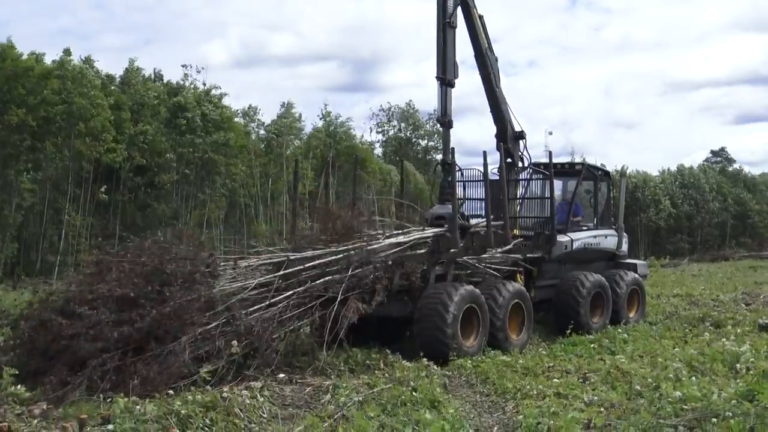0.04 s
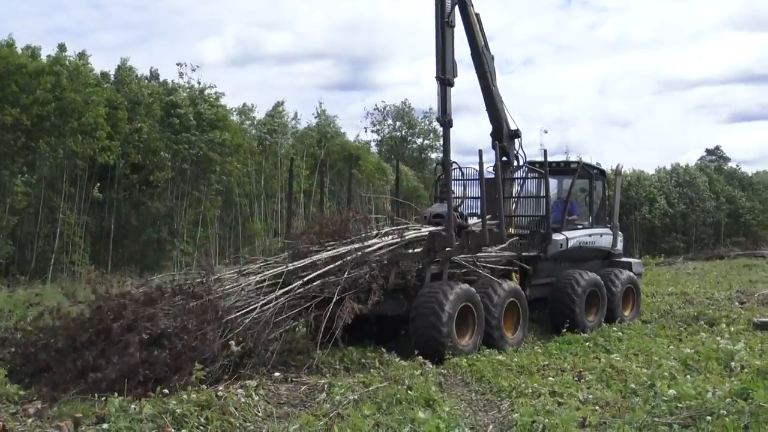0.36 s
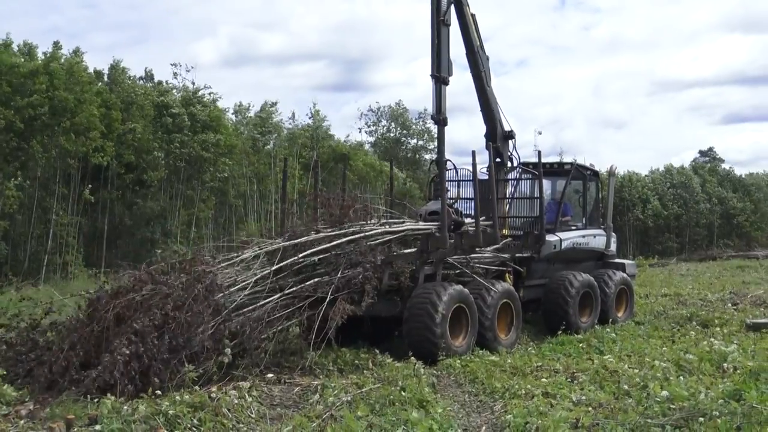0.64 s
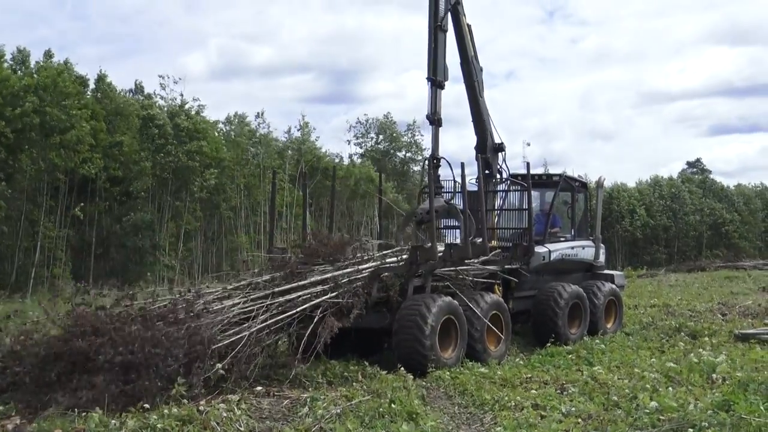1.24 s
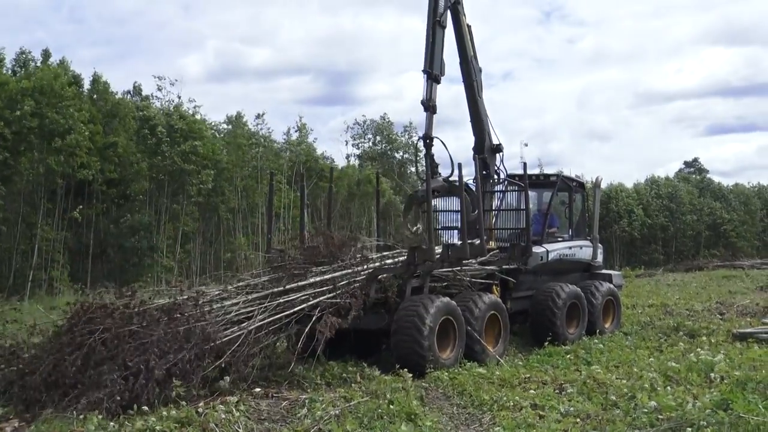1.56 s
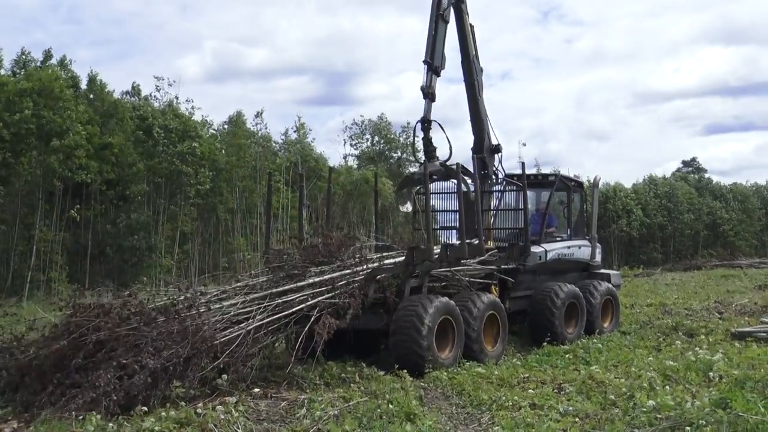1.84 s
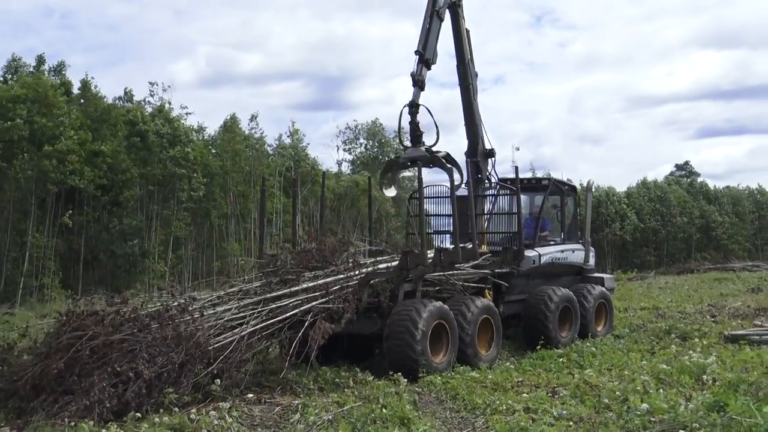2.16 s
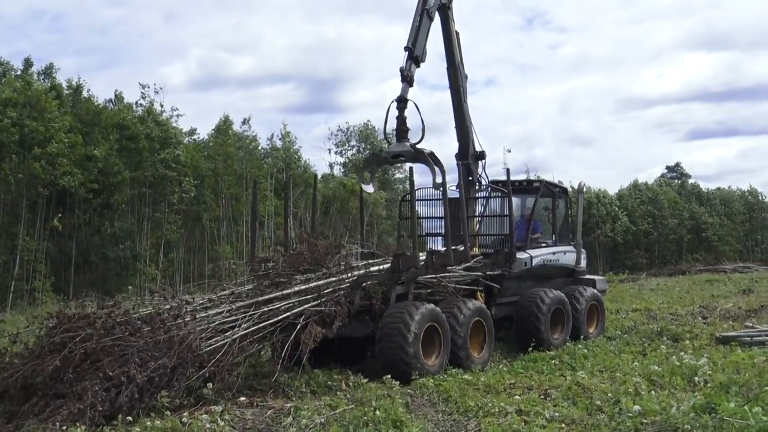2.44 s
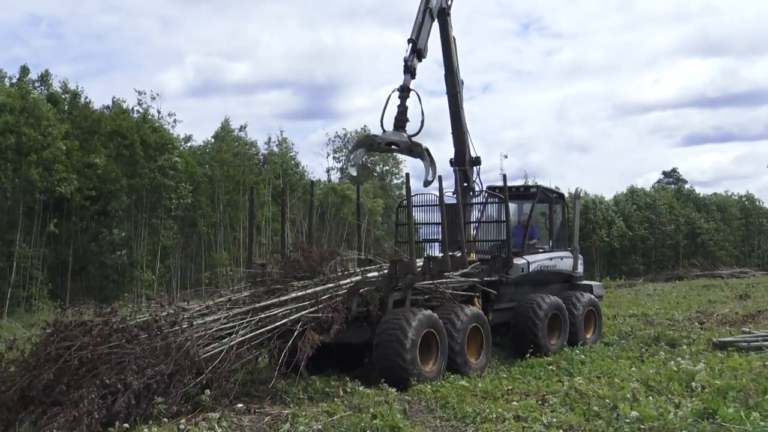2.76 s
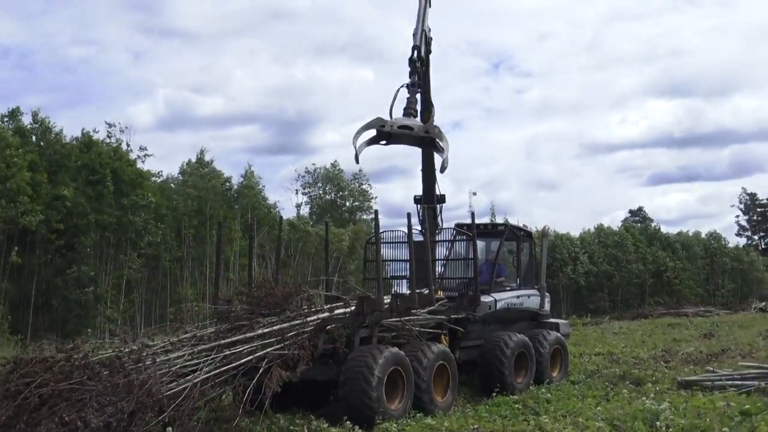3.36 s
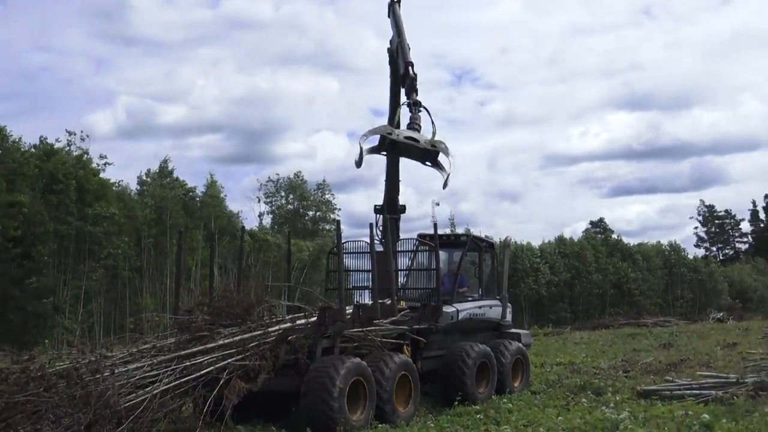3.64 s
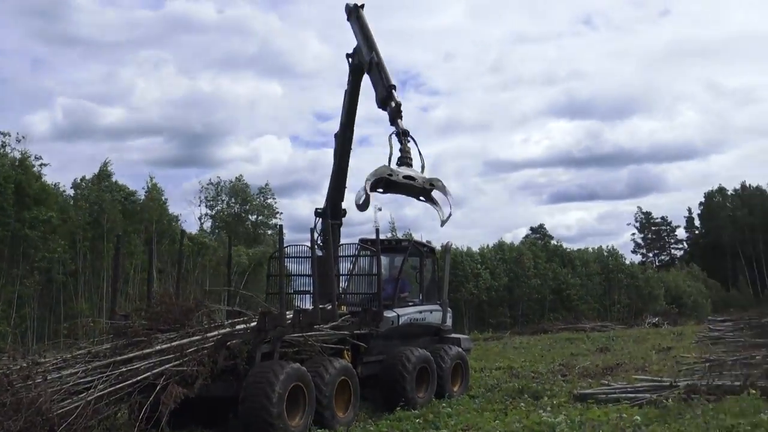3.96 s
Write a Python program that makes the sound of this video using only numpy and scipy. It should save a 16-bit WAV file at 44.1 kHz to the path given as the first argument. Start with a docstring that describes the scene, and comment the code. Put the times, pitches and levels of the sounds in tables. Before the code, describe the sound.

Brush rustles and thuds onto a forestry machine's bed for the first 1.5 seconds, with a brief creak near 0.9. The steel grapple clanks loudly at about 1.4 and 1.9 seconds, echoing off the trees. Underneath, the diesel engine grows louder, sags around 1.4 seconds and recovers. From 2 seconds, faint hydraulic hiss and whine join it, with a small knock near 3.4. Light wind buffets the microphone.

```python
"""Twigs rustle, stems thrash, thud and creak: a forestry forwarder drops brush on its bed.
The steel grapple swings open and clanks against its stops, echoing off the forest edge.
Underneath, diesel firings puff through the exhaust; the engine sags under load and recovers.
The hydraulic pump whines, oil hisses through the valves, light wind buffets the microphone."""
import sys
import numpy as np
from scipy import signal
from scipy.fft import rfft, irfft, next_fast_len
from scipy.io import wavfile
from scipy.ndimage import uniform_filter1d, map_coordinates

SR = 44100
rng = np.random.default_rng(int(sys.argv[2]) if len(sys.argv) > 2 else 0)


def to_wav(sig):
    """Store sig (one row per channel, or 1-D mono) as 16-bit WAV at the path in sys.argv[1].

    Samples outside -1..1 are clipped; the rate is SR.
    """
    pcm = np.clip(np.atleast_2d(sig), -1, 1) * 32767
    pcm = np.round(pcm).astype(np.int16)
    wavfile.write(sys.argv[1], SR, pcm.T)  # frames by channels


N = 176400

# wind at the microphone: t/s, level/dB
WIND_DB = [(0, -46), (.2, -38), (.42, -39), (.6, -66), (1.0, -49), (2.65, -54), (2.81, -37), (2.92, -45),
           (3.25, -41.5), (3.48, -48), (3.66, -35.5), (4, -44)]
# wind spectrum: f/Hz, density/dB
WIND_SPECTRUM = [(10, -9), (32, 1), (120, -2.5), (250, -19), (800, -59)]
# forest edge decay: f/Hz, t60/s
FOREST_T60_S = [(200, 0.82), (2000, 0.74), (9000, 0.36)]

# engine speed: t/s, firing rate/Hz
FIRING_HZ = [(0, 47), (.8, 46), (1.07, 44.8), (1.38, 41.3), (1.49, 41.6), (1.63, 45.6), (1.75, 47.8),
             (1.92, 45.9), (1.98, 46), (2.2, 48.7), (2.35, 49.6), (2.93, 47.3), (3.55, 47.7), (4, 47.5)]
# exhaust: t/s, level/dB
EXHAUST_DB = [(0, -43), (.5, -51), (.75, -50.5), (.95, -44.5), (1.15, -36.5), (1.4, -32.5), (1.75, -35.5),
              (2.05, -33.5), (2.4, -41), (2.7, -36), (3.1, -34), (3.5, -35.5), (4, -36)]
# exhaust direction: t/s, left minus right/dB
EXHAUST_PAN_DB = [(1.5, 0.5), (2.2, -0.5), (3, -3)]
# pipe and silencer: f/Hz, gain/dB
PIPE_RESPONSE = [(20, -45), (47, -4), (95, 0.5), (143, 2.5), (190, -4.5), (250, -21), (340, -19),
                 (480, -20.5), (800, -41.5), (2000, -74)]
# machine hums: f/Hz, base level/dB
HUM_TONES = [(215.3, -47.5), (333.8, -56.5)]
# hums, strongest as the crane swings: t/s, gain/dB
HUM_GAIN_DB = [(.8, -11), (1.5, -1), (2.4, -0.5), (3.2, 2.5), (4, 1.5)]
# diesel clatter: f/Hz, density/dB
CLATTER_SPECTRUM = [(100, -4.5), (200, 1), (430, 0), (650, -4), (900, -9.5), (1150, -5), (1520, -16.5),
                    (2200, -16), (3500, -22.5), (8000, -25), (11000, -33), (15000, -57)]
# hydraulic pump: t/s, level/dB
WHINE_DB = [(2.3, -69), (2.55, -61), (2.76, -65), (2.82, -58), (3.1, -56.5), (3.3, -60), (3.62, -60),
            (3.7, -54), (3.87, -56), (3.95, -65)]
# oil in the crane's valves: t/s, base level/dB
HISS_DB = [(1.4, -63), (2.2, -54.5), (2.65, -52), (3.1, -62), (3.7, -53), (4, -53.5)]
# oil rush: f/Hz, density/dB
OIL_SPECTRUM = [(1500, -16), (3500, 0.5), (7500, -0.5), (10500, -7.5), (16000, -28)]
# valve whistles: f/Hz
VALVE_WHISTLE_HZ = [3230, 3900, 5950, 6900, 8400, 10500]
# band of one whistle: f/centre, density/dB
WHISTLE_SHAPE = [(.8, -60), (.96, -15), (1, 0), (1.04, -15), (1.25, -60)]

# twigs and leaves: t/s, level/dB
RUSTLE_DB = [(0, -31.5), (.27, -35), (.46, -38.5), (.56, -35.5), (.75, -40.5), (.83, -38), (.93, -35),
             (1.05, -34), (1.21, -37), (1.4, -33.5), (1.52, -40.5), (1.85, -49), (2.6, -64)]
# twig spectrum: f/Hz, density/dB
TWIG_SPECTRUM = [(200, -10.5), (500, 4), (800, 5), (1600, -1), (3000, -1.5), (4200, 2), (7600, 4),
                 (10000, -1.5), (13000, -9.5), (16000, -25)]
# stems thrashing together: centre/s, spread/s, f/Hz, spread/octaves, level/dB
STEM_THRASHES = [(.01, .03, 248, 1.14, -38), (.09, 0.04, 1470, 0.68, -34), (.1, 0.043, 730, 0.22, -31),
                 (0.198, 0.013, 151, 1.49, -26), (0.261, 0.021, 296, 0.72, -30),
                 (.345, 0.019, 258, 0.52, -30), (.405, 0.019, 185, 0.71, -31),
                 (0.42, 0.0085, 1190, 0.19, -39), (.458, 0.0052, 910, 0.67, -34),
                 (.472, 0.017, 315, 0.33, -29.5), (.555, 0.029, 367, 0.41, -28),
                 (.68, 0.02, 372, 0.45, -38.5), (.735, 0.011, 370, 0.41, -34.5),
                 (0.864, .01, 170, 0.48, -35.5), (.928, .008, 1400, 0.65, -33),
                 (0.976, .014, 456, 0.55, -30), (.992, 0.014, 135, 0.78, -28),
                 (1.088, 0.0037, 1110, 0.54, -37), (1.162, 0.0039, 2940, 0.17, -32),
                 (2.26, 0.04, 148, 0.26, -36.5)]
# stem body: f/Hz, gain/dB
STEM_RESPONSE = [(25, -30), (60, -2.5), (110, 0.5), (2000, -1), (5000, -9)]

# grapple and crane pins knocking in their bushes: t/s, f/Hz, level/dB, t60/s
PIN_KNOCKS = [(1.9, 703, -22, .08), (1.937, 1995, -18.5, 0.074), (3.047, 910, -42, 0.015),
              (3.371, 3130, -35, 0.032), (3.389, 3300, -42.5, 0.038), (3.388, 686, -27, 0.055)]
# band of one pin's ring: f/centre, density/dB
PIN_SHAPE = [(.4, -50), (.85, -26), (.97, -7), (1, 0), (1.03, -7), (1.18, -26), (2.5, -55)]
# steel contacts of the grapple: t/s, base level/dB, tilt/(dB per octave)
GRAPPLE_CONTACTS = [(1.433, -16.5, -3), (1.443, -15.5, 0.5), (1.461, -16.5, -0.5), (1.47, -19.5, -1.5),
                    (1.519, -33.5, 4), (1.584, -31.5, 2), (1.694, -22, 1.5), (1.767, -29.5, 2.5),
                    (1.878, -20.5, 1.5), (1.884, -16.5, -3), (1.903, -12.5, -1), (1.914, -19, -0.5),
                    (1.921, -16.5, 1), (1.938, -27, -1.5), (1.966, -25, 1), (2.031, -22, 2.5),
                    (2.18, -34, -1)]
# grapple modes: f/Hz, gain half closed/dB, gain wide open/dB, t60/s
GRAPPLE_MODES = [(373.5, -17.5, -17, 1), (689, -6, -0.5, 0.11), (741, 0, 4.5, .11), (799, 1, -3, 0.12),
                 (989, -4, -3.5, 0.2), (1077, -0.5, -2, 0.12), (1146, -3, -1, 0.11), (1289, -6, -4, 0.16),
                 (1336, -2.5, -17, 0.13), (1723, -4.5, -16, .15), (1812, -4, -3, 0.21), (1956, -4, 0, .11),
                 (2280, -6, -9.5, 0.24), (2680, -10, -13, 0.18), (2950, -6.5, -8.5, 0.19),
                 (3500, -1.5, -24, 0.11), (3670, -18, -10, 0.15), (3960, -8, -15, 0.16),
                 (4910, -21, -20, 0.13)]
# jaws opening: start/s, end/s
JAW_TRAVEL_S = [1.5, 1.85]
# contact crash: f/Hz, density/dB
CRASH_SPECTRUM = [(100, -18), (430, -15.5), (550, -2), (780, -1.5), (870, -7), (1300, -4.5), (1480, -8.5),
                  (3000, -9), (4800, -12.5), (7000, -20), (11000, -32), (16000, -63)]

# microphone port balance: f/Hz, left minus right/dB
PORT_BALANCE_DB = [(40, 2.5), (170, 3.5), (300, -2), (470, -4), (620, -1.3), (1300, -2), (1750, 0.5),
                   (6500, 0.5), (11000, 2.5), (13500, 0.5)]
# microphone port phase: f/Hz, left lead/rad
PORT_LEAD_RAD = [(4900, 0), (6300, -0.39), (10000, -0.29), (11800, -0.1)]

TIME_S = np.arange(N) / SR
HALF_LEFT_RIGHT = np.array([[.5], [-.5]])


def amp(db):
    """Decibels to gain."""
    return 10 ** (np.asarray(db) / 20)


def unit(x):
    """Scale to rms 1."""
    return x / np.sqrt(np.mean(x ** 2) + 1e-20)


def along(points, hz):
    """Interpolate (f/Hz, value) points on a log axis."""
    points_hz, values = np.transpose(points)
    return np.interp(np.log(hz + 1), np.log(points_hz + 1), values)


def curve(points):
    """Interpolate (t/s, value) points per sample."""
    return np.interp(TIME_S, *np.transpose(points))


def wobble(rate_hz):
    """Smooth random curve with knots at rate_hz."""
    knots = rng.standard_normal(int(N * rate_hz / SR) + 4)
    return map_coordinates(knots, [TIME_S * rate_hz])


def coloured(x, response):
    """Minimum-phase filter from (f/Hz, gain/dB) points."""
    size = 2 * next_fast_len(x.shape[-1] // 2 + 4096)
    gain = amp(along(response, np.fft.rfftfreq(size, 1 / SR)))
    cepstrum = irfft(np.log(gain))
    cepstrum[1:size // 2] *= 2
    cepstrum[size // 2 + 1:] = 0
    return irfft(rfft(x, size) * np.exp(rfft(cepstrum)), size)[..., :x.shape[-1]]


def noise(spectrum):
    """Coloured noise, rms 1."""
    return unit(coloured(rng.standard_normal(N), spectrum))


def band_noise(centre_hz, shape):
    """Noise band around centre_hz, rms 1."""
    return noise([(centre_hz * ratio, db) for ratio, db in shape])


def patchy(x, depth_db):
    """Random swells, about 600 Hz by 60 ms each; rms 1."""
    bins = signal.stft(x, nperseg=512)[2]
    field = uniform_filter1d(rng.standard_normal(bins.shape), 7, axis=0)
    field = unit(uniform_filter1d(field, 11, axis=1))
    return unit(signal.istft(bins * amp(depth_db * field), nperseg=512)[1][:N])


def add(track, start_s, sound):
    """Mix sound into track at start_s."""
    part = track[max(round(start_s * SR), 0):][:len(sound)]
    part += sound[:len(part)]


def grains(times_s, hz, gains, t60_cycles, samples):
    """Sum of short damped sines."""
    cycles = hz[:, None] * TIME_S[:samples]
    waves = gains[:, None] * np.sin(2 * np.pi * cycles) * amp(-60 * cycles / t60_cycles)
    index = (np.abs(times_s) * SR).astype(int)[:, None] + np.arange(samples)
    return np.bincount(index.ravel(), waves.ravel(), N)[:N]


def stereo(mid, side, side_db=-22):
    """Mid and side to left and right."""
    return np.array([mid + amp(side_db) * side, mid - amp(side_db) * side])


def wind(buffet_db=3):
    """Soft low buffets at the microphone."""
    return amp(curve(WIND_DB)) * unit(noise(WIND_SPECTRUM) * amp(buffet_db * wobble(12)))


def forest_echo(x, delay_s=.018, gain_db=-11):
    """Diffuse echo from the trees; treble dies first."""
    hz, t, bins = signal.stft(rng.standard_normal((2, SR)), SR, nperseg=256)
    decay = amp(-60 * t / along(FOREST_T60_S, hz)[:, None])
    tail = signal.istft(bins * decay, SR, nperseg=256)[1]
    tail /= np.linalg.norm(tail[0])
    delayed = np.pad(x, (int(delay_s * SR), 0))
    mid, side = signal.fftconvolve(delayed[None], tail, axes=1)[:, :N]
    return amp(gain_db) * stereo(mid, side)


def hums(drift_rad=1):
    """Machine hums with drifting phase."""
    tones = sum(amp(db) * unit(np.sin(2 * np.pi * hz * TIME_S + drift_rad * wobble(8)))
                for hz, db in HUM_TONES)
    return amp(curve(HUM_GAIN_DB)) * tones


def valves(rush_db=-2, whistle_db=-12.5, swell_db=3.5):
    """Oil rush with narrow whistles that come and go."""
    whistles = np.zeros(N)
    for hz in VALVE_WHISTLE_HZ:
        whistle = band_noise(hz, WHISTLE_SHAPE) * amp(swell_db * wobble(6))
        whistles += amp(along(OIL_SPECTRUM, hz)) * unit(whistle)
    return amp(curve(HISS_DB)) * (amp(rush_db) * noise(OIL_SPECTRUM) + amp(whistle_db) * whistles)


def pump(firing_cycles, pulsing, cycles_per_firing=40.65, rough_rad=.41):
    """Shaft-driven pump: the whine tracks engine speed."""
    phase_rad = 2 * np.pi * cycles_per_firing * firing_cycles + rough_rad * wobble(60)
    return amp(curve(WHINE_DB)) * unit(np.sin(phase_rad) * np.sqrt(pulsing))


def exhaust(firing_cycles, jitter_s=.00012, scatter_db=1.5):
    """One puff per firing through pipe and silencer; rms 1."""
    firings = np.flatnonzero(np.diff(np.floor(firing_cycles)))
    lateness, strength = rng.standard_normal((300, 2))[:len(firings)].T
    index = np.clip(firings + jitter_s * SR * lateness, 0, N - 1).astype(int)
    puffs = np.bincount(index, amp(scatter_db * strength), N)
    return unit(coloured(puffs, PIPE_RESPONSE))


def engine(clatter_db=-42, pulse_db=2.6, lag_cycles=.15, flutter_db=1.73, throb_db=.7):
    """Diesel with pump and hums: each firing puffs, then rattles the block."""
    firing_cycles = np.cumsum(curve(FIRING_HZ)) / SR
    puffs = exhaust(firing_cycles)
    beat = np.cos(2 * np.pi * (firing_cycles - lag_cycles))
    pulsing = amp(pulse_db * beat + flutter_db * wobble(25.21))
    tones = hums() + pump(firing_cycles, pulsing)
    exhaust_db = curve(EXHAUST_DB) + throb_db * wobble(9) + curve(EXHAUST_PAN_DB) * HALF_LEFT_RIGHT
    clatter = unit(pulsing * noise(CLATTER_SPECTRUM))
    return amp(exhaust_db) * puffs + amp(clatter_db) * clatter + tones


def twigs(snaps_per_s=500, snap_hz=4400, span_octaves=2.56, snap_db=-10, scatter_db=4, flutter_db=.45):
    """Wash of sliding twigs with many tiny snaps."""
    count = int(snaps_per_s * N / SR)
    when, pitch, strength = rng.random((8000, 3))[:count].T
    gains = amp(-scatter_db * np.log(np.maximum(strength, .04)))
    hz = snap_hz * 2 ** (span_octaves * (pitch - .5))
    snaps = grains(when * N / SR, hz, gains, t60_cycles=5, samples=200)
    wash = patchy(noise(TWIG_SPECTRUM), depth_db=1.5)
    mid = unit(wash + amp(snap_db) * unit(coloured(snaps, TWIG_SPECTRUM)))
    return stereo(mid, noise(TWIG_SPECTRUM)) * amp(curve(RUSTLE_DB) + flutter_db * wobble(60.2))


def creak(start_s=.912, length_s=.052, from_hz=1150, to_hz=3000, slips_per_s=420, level_db=-36.5):
    """A stem sticks and slips off the jaws; pitch climbs as the contact tightens."""
    count = int(length_s * slips_per_s)
    lateness, detune, strength = rng.standard_normal((3, count))
    progress = (np.arange(count) + .25 * lateness) / count
    hz = from_hz * (to_hz / from_hz) ** (progress + .2 * detune)
    slips = grains(start_s + length_s * progress, hz, amp(3 * strength), t60_cycles=15, samples=1200)
    return amp(level_db) * unit(slips) * np.sqrt(length_s * SR / N)


def stems(knocks_per_s=1500):
    """Each thrash: a flurry of dull, quickly damped knocks of green wood."""
    out = np.zeros(N)
    for centre_s, spread_s, hz, octaves, db in STEM_THRASHES:
        count = int(knocks_per_s * spread_s * 6)
        lateness, detune, strength = rng.standard_normal((1000, 3))[:count].T
        times_s = centre_s + spread_s * np.linspace(-3, 3, count) + lateness / knocks_per_s
        knock_hz = np.clip(hz * 2 ** (octaves * detune), 40, 8000)
        knocks = grains(times_s, knock_hz, strength * np.sqrt(knock_hz), t60_cycles=11.2, samples=1500)
        swell = np.exp(-((TIME_S - centre_s) / spread_s) ** 2 / 4)
        out += amp(db) * unit(swell * knocks) * np.sqrt(np.mean(swell ** 2))
    return coloured(out, STEM_RESPONSE)


def pins():
    """Each pin knocks in its bush: one short, narrow ring."""
    out = np.zeros(N)
    for start_s, hz, db, t60_s in PIN_KNOCKS:
        add(out, start_s, amp(db - 60 * TIME_S / t60_s) * band_noise(hz, PIN_SHAPE))
    return out


def jaw_stop(start_s=1.922, level_db=-24.5, t60_s=.017):
    """Brief, bright crack of steel on steel as the jaws reach their stop."""
    out, t = np.zeros(N), TIME_S[:SR // 10]
    burst = unit(uniform_filter1d(rng.standard_normal(len(t)), size=3))
    add(out, start_s, amp(level_db - 60 * t / t60_s) * burst)
    return out


def grapple(crash_db=-2, crash_t60_s=.09, ring_db=-10.3, scatter_db=1.5, linewidth_hz=30, attack_s=.003):
    """Each contact: a crash plus a ring roughened by loose joints; mode gains shift as the jaws open."""
    out, t = np.zeros(N), TIME_S[:int(.7 * SR)]
    hz, half_closed_db, open_db, t60_s = np.transpose(GRAPPLE_MODES)[:, :, None]
    attack = 1 - np.exp(-t / attack_s)
    decay = amp(-60 * t / t60_s)
    step_rad = np.sqrt(2 * np.pi * linewidth_hz / SR)
    for start_s, db, db_per_octave in GRAPPLE_CONTACTS:
        tilt_db = lambda f: db_per_octave * np.log2(f / 1500)
        spectrum = [(f, density_db + tilt_db(f)) for f, density_db in CRASH_SPECTRUM]
        crash = unit(coloured(rng.standard_normal(len(t)), spectrum)) * amp(-60 * t / crash_t60_s)
        opening = np.interp(start_s, JAW_TRAVEL_S, [0, 1])
        mode_db = half_closed_db + (open_db - half_closed_db) * opening
        gains = amp(mode_db + tilt_db(hz) + scatter_db * rng.standard_normal(hz.shape))
        rattle_rad = step_rad * np.cumsum(rng.standard_normal(decay.shape), axis=1)
        phase_rad = 2 * np.pi * (hz * t + rng.random(hz.shape)) + rattle_rad
        ring = np.sum(gains * decay * np.sin(phase_rad), axis=0)
        add(out, start_s, amp(db) * (amp(crash_db) * crash + amp(ring_db) * ring) * attack)
    return out


def scene():
    """Machine straight ahead; only the steel echoes off the trees."""
    steel = grapple() + pins() + jaw_stop()
    return steel + forest_echo(steel) + engine() + valves() + twigs() + stems() + creak() + wind()


def record(dry, cutoff_hz=15900):
    """Two microphone ports, slightly unequal in colour and phase; band-limited."""
    size = next_fast_len(N + SR // 4)
    hz = np.fft.rfftfreq(size, 1 / SR)
    balance = amp(along(PORT_BALANCE_DB, hz) * HALF_LEFT_RIGHT)
    phase_shift = np.exp(1j * along(PORT_LEAD_RAD, hz) * HALF_LEFT_RIGHT)
    return irfft(rfft(dry, size) * balance * phase_shift * (hz < cutoff_hz), size)[:, :N]


dry = scene()
out = record(dry)
to_wav(out)
```